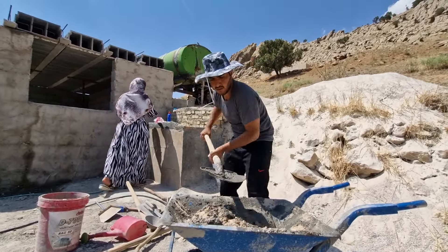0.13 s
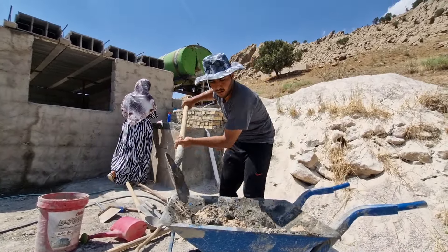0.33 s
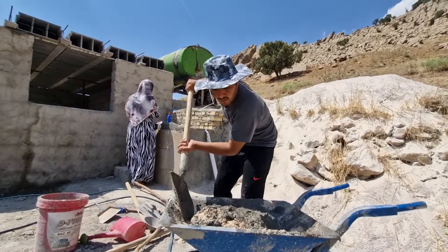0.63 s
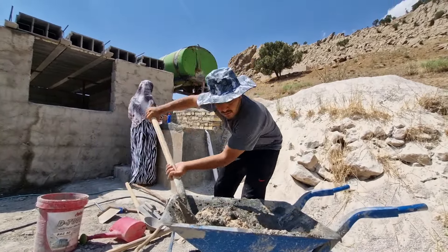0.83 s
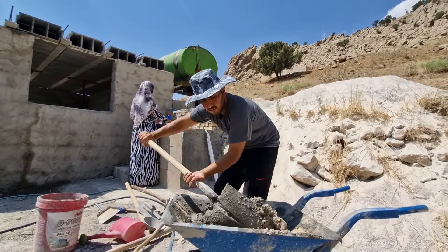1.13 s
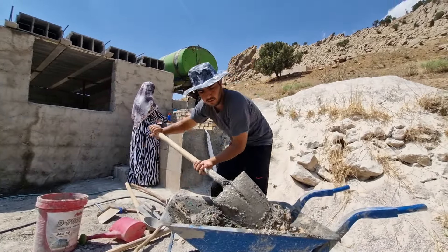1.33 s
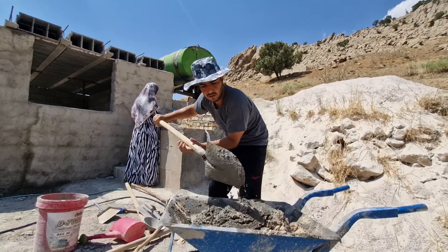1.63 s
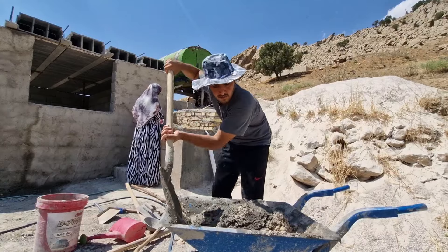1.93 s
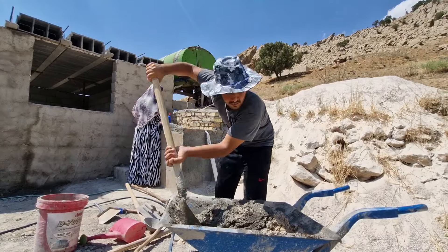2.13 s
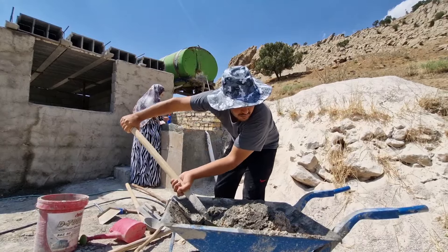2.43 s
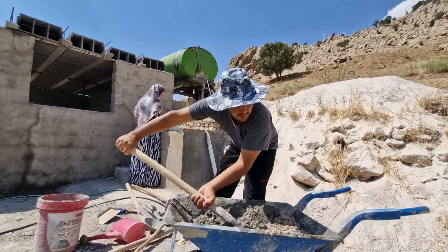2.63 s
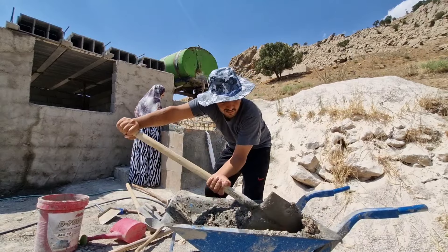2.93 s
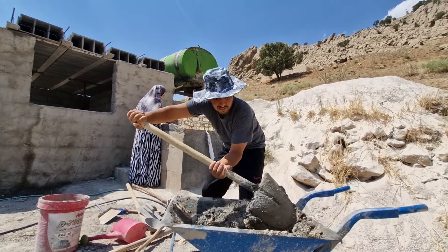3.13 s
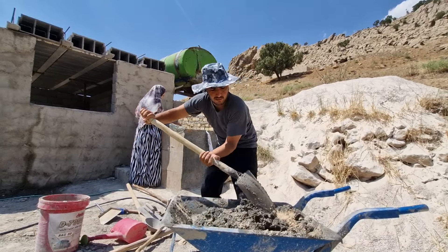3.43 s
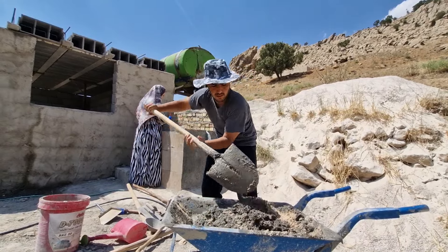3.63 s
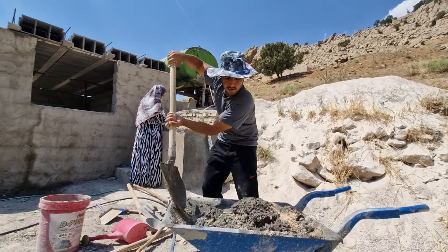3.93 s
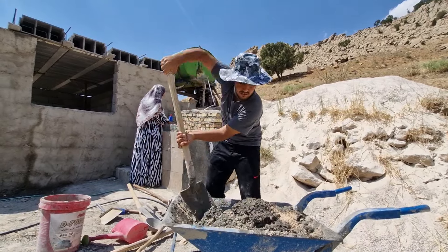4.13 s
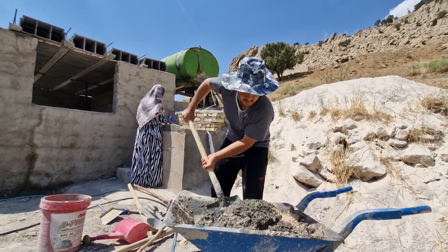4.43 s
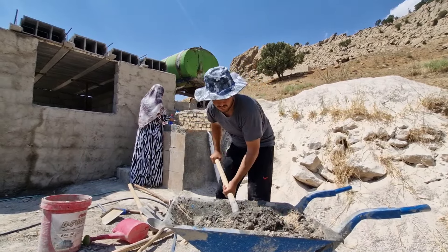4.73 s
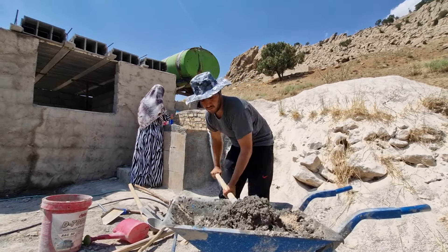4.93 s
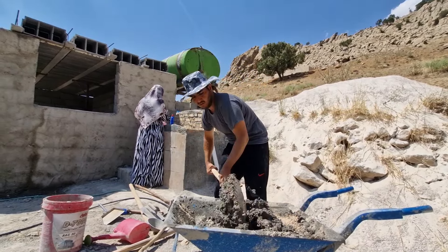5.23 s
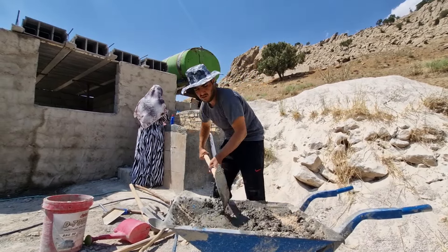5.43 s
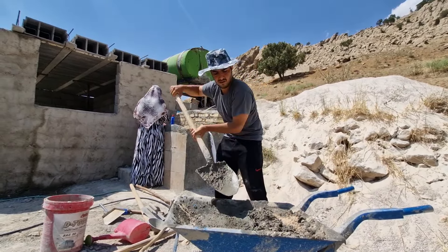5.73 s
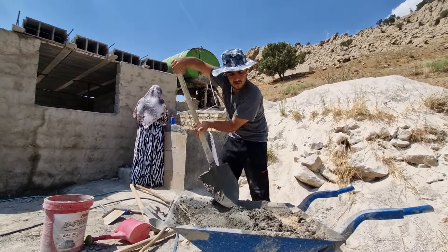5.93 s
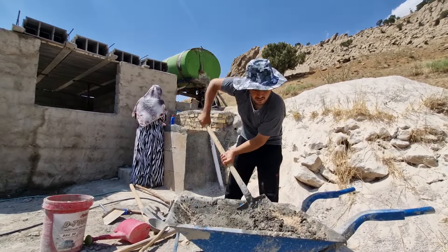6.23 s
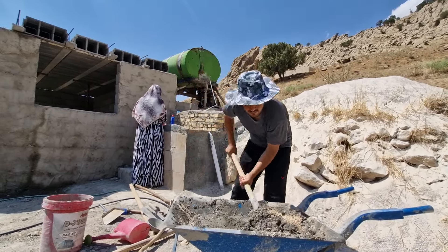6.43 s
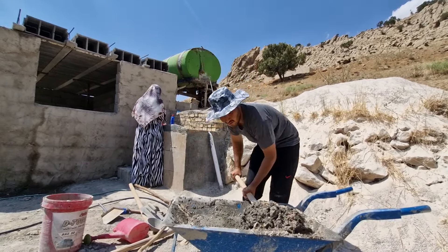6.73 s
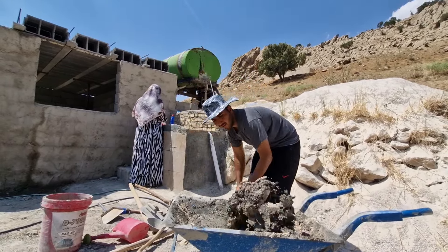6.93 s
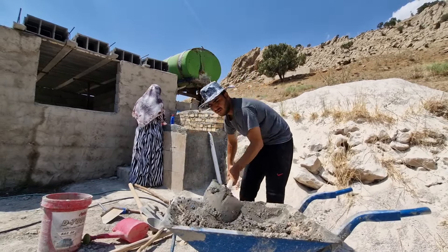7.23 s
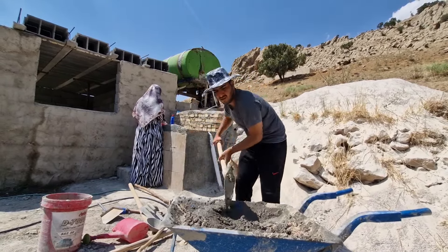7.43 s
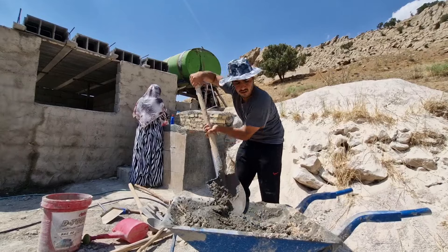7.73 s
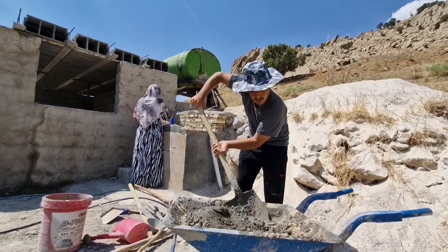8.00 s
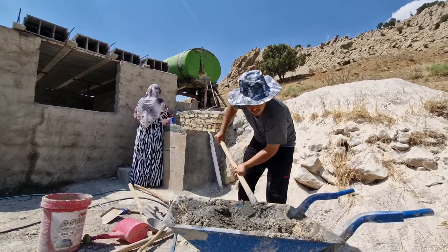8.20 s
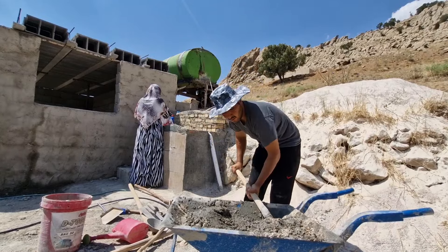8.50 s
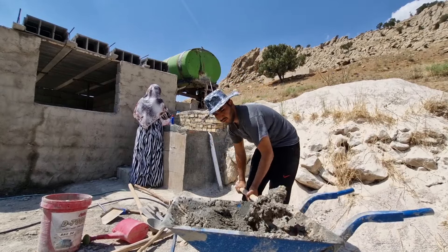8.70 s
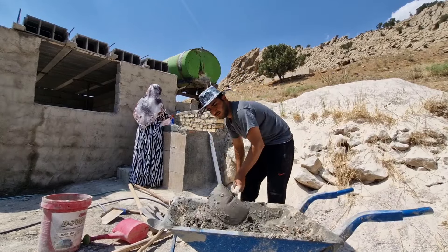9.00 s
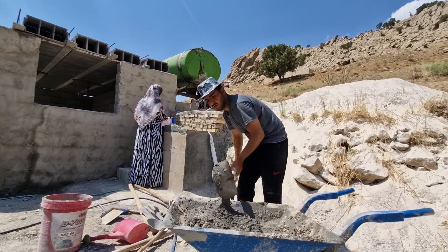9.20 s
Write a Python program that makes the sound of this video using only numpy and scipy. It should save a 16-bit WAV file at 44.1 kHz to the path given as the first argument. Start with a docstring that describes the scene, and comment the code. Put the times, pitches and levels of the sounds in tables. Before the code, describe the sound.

An open outdoor building site, dry and echo-free, heard close up in stereo. A faint distant rush and low wind buffeting run throughout, with soft puffs near 0.6, 2.7 to 3.7 and 5.2 s. Tiny thin rings open the scene. From 0.45 to 1 s a steel shovel crunches into wet, stony mortar in a metal wheelbarrow, with quick knocks. A lull of faint grainy rustle follows, then gritty scrapes, cracks and hollow tray knocks from 1.7 to 2.7 s. After a quiet gap with ticking crumbs, a sharp clank at 3.94 s starts scrapes and dull slaps until 4.7 s. Small knocks come around 5.1 and 5.4 s. Another clank at 5.87 s leads to heavy grinding and booming tray knocks until 6.5 s. A pause, a muted slap at 7.45 s, then the densest cluster of scrapes and blows from 7.7 to 8.4 s, fading to rustle and wind by 9.3 s.

```python
"""Outdoors by a two-port microphone: distant rush of the open site, low wind buffeting with puffs, faint rings,
a faint grainy rustle that drops out in places, crumbs ticking on steel.
From about 0.45 s a steel shovel works wet mortar in a sheet-metal wheelbarrow, in pushes and pauses.
The blade grinds sand and stones (noise in grains through its modes) over the tray, which hums at a pitch
set by the load of mortar; stones knock and lumps slap down (damped rings, noise bursts), densest near 8 s."""
import sys
import numpy as np
from scipy import signal
from scipy.fft import rfft, irfft, next_fast_len
from scipy.io import wavfile
from scipy.ndimage import uniform_filter1d, map_coordinates

SR = 44100
rng = np.random.default_rng(int(sys.argv[2]) if len(sys.argv) > 2 else 0)


def inscribe(sig):
    """Save sig as 16-bit PCM at rate SR to the path in sys.argv[1].

    A 1-D sig is mono; a 2-D sig holds one channel per row.
    Samples are clipped to [-1, 1] before scaling.
    """
    pcm = np.round(np.clip(np.atleast_2d(sig).T, -1, 1) * 32767)
    wavfile.write(sys.argv[1], SR, pcm.astype(np.int16))


N = 412776
TOP_HZ = 16150
# Table levels are relative: layer gains and the final balance follow.


def amp(db):
    """dB to amplitude factor."""
    return 10 ** (np.asarray(db) / 20)


def unit(x):
    """Scale to rms 1."""
    return x / np.sqrt(np.mean(np.abs(x) ** 2) + 1e-20)


def along(points, hz):
    """Interpolate (frequency [Hz], value) points on a log axis."""
    f, v = np.transpose(points)
    return np.interp(np.log(hz + 1), np.log(f + 1), v)


def curves(rows):
    """One value per sample for each column after the time."""
    s, *cols = np.transpose(rows)
    return [np.interp(np.arange(N) / SR, s, c) for c in cols]


def wobble(knots_hz):
    """Smooth random curve through random knots."""
    knots = rng.standard_normal(int(N * knots_hz / SR) + 4)
    return map_coordinates(knots, [np.arange(N) * knots_hz / SR])


def filtered(x, response):
    """Multiply the spectrum by a complex response of frequency."""
    m = next_fast_len(N + SR // 2)
    return irfft(rfft(x, m) * response(np.fft.rfftfreq(m, 1 / SR)), m)[..., :N]


def decaying(x, life_s):
    """One-pole exponential decay with time constant life_s."""
    return signal.lfilter([1], [1, -np.exp(-1 / (life_s * SR))], x)


def grains(rate_hz, spread_db, life_s):
    """Envelope of random contacts: sudden start, quick decay, a few much stronger than the rest."""
    strength = amp(spread_db * np.minimum(rng.exponential(size=N), 4))
    return decaying((rng.random(N) < rate_hz / SR) * strength, life_s)


def coloured(spectrum, envelope):
    """Two noises under one envelope, with the given spectrum, rms 1."""
    noise = envelope * rng.standard_normal((2, N))
    return unit(filtered(noise, lambda hz: amp(along(spectrum, hz))))


def ports(pair, alike, lags):
    """Left and right from a shared signal and a differing one, with a left-right lag for each stretch."""
    turn = lambda hz: np.arccos(np.clip(along(alike, hz), -1, 1)) / 2
    mid, side = filtered(pair, lambda hz: [np.cos(turn(hz)), np.sin(turn(hz))])
    both, out = np.array([mid + side, mid - side]), np.zeros((2, N))
    signs = np.array([[1], [-1]])  # each port takes half the lag
    for s, bass_s, treble_s in lags:
        lag_s = lambda hz: along([(1300, bass_s), (2200, treble_s)], hz)
        late = filtered(both, lambda hz: np.exp(-1j * np.pi * hz * lag_s(hz) * signs))
        start = round(s * SR)
        out[:, start:] = late[:, start:]
    return out


def patchy(x, depth_db):
    """Random gain patches, a few hundred Hz wide and some tens of ms long."""
    z = signal.stft(x, nperseg=256)[2]
    field = uniform_filter1d(rng.standard_normal(z.shape[1:]), size=3, axis=0)
    field = uniform_filter1d(field, size=10, axis=1)
    return signal.istft(z * amp(depth_db * unit(field)), nperseg=256)[1][:, :N]


# site spectrum: (frequency [Hz], level [dB])
SITE_SPECTRUM = [(71, -37), (120, -11), (167, -8.5), (302, -1.5), (897, -10.5), (1100, -6), (3340, -29.5),
                 (5240, -31.5), (8060, -39.5), (13200, -30.5), (16200, -34)]
# site level: (time [s], level [dB])
SITE_LEVEL = [(0, -52), (3, -54), (6, -47.5), (8.5, -53.5), (9.36, -54)]


def site():
    """Distant rush of the open site: coloured noise, gently unsteady."""
    rush = coloured(SITE_SPECTRUM, amp(1.75 * wobble(5.4) + 0.45 * wobble(0.68)))
    alike = [(200, 0.87), (1000, 0.96), (4000, 0.084)]
    return amp(curves(SITE_LEVEL)[0]) * ports(rush, alike, [(0.00069, -0.00035, -0.00035)])


# buffeting spectrum: (frequency [Hz], level [dB])
BUFFET_SPECTRUM = [(11, -37), (18, -27), (44, 3), (65, 2), (127, -8.5), (200, -18.5), (260, -41.5),
                   (440, -120)]
# buffeting level: (time [s], level [dB])
WIND_LEVEL = [(0.0, -53), (0.34, -63), (0.73, -53), (1.64, -59), (2.55, -50), (3.15, -47.5), (3.26, -52),
              (4.09, -47.5), (6.33, -53), (6.86, -60), (8.32, -53), (8.6, -49), (9.36, -61)]
# single puffs: (time [s], peak [dB], frequency [Hz])
PUFFS = [(0.136, -36, 76.4), (0.603, -24.5, 59.3), (2.685, -24.5, 56.93), (3.047, -23, 71),
         (3.255, -29, 60.5), (3.66, -24, 69.94), (4.627, -29, 54), (5.163, -24, 82), (5.24, -27, 60),
         (5.355, -26, 64)]


def wind():
    """Wind pressure on the microphone: low noise, partly different at each port, and puffs of about one swing."""
    (db,) = curves(WIND_LEVEL)
    lumps = amp(2.4 * wobble(17) + 5.3 * np.array([wobble(11), wobble(28)]))
    push, t = np.zeros(N + SR), np.arange(SR // 8) / SR
    for s, peak_db, hz in PUFFS:
        cycles = t * hz - 1.2
        puff = np.exp(-(cycles / 0.43) ** 2) * np.cos(2 * np.pi * cycles)
        push[round(s * SR):][:len(t)] += amp(peak_db) * puff
    buffet = amp(db + 6.5) * unit(lumps * coloured(BUFFET_SPECTRUM, 1))
    pair = buffet + push[:N] * [[1.2], [-.3]]
    return ports(pair, [(30, 0.088), (120, 0.078)], [(0.0056, 0.00054, 0)])


# faint short rings: (start [s], length [s], frequency [Hz], level [dB])
CHIRPS = [(0.01, 0.07, 2150, -51), (0.133, 0.016, 2130, -48)]


def chirps():
    """Faint thin tones, slightly wavering in level and pitch."""
    t, total = np.arange(N) / SR, np.zeros(N)
    for s, length_s, hz, db in CHIRPS:
        shape = np.sin(np.pi * np.clip((t - s) / length_s, 0, 1)) ** .5
        level = amp(db + 3.5 * wobble(52.3))
        turns = np.cumsum(hz * (1 + 0.004 * wobble(150))) / SR
        total += level * shape * np.sin(2 * np.pi * turns)
    return total * [[1.1], [.4]]


# grit, wet body and fine sand spectra, shared with scraping(): (frequency [Hz], level [dB])
GRIT_SPECTRUM = [(1060, -71), (1800, 8), (2020, 2), (2310, 8), (2500, 2.5), (3750, 5), (6400, 1),
                 (7600, -21), (9750, -30.5), (16500, -120)]
BODY_SPECTRUM = [(320, -7.5), (550, -3.5), (642, -3.5), (952, -1), (1150, -13.5), (1450, -7.5),
                 (2400, -17.5), (3120, -53), (5280, -120)]
SAND_SPECTRUM = [(4120, -1.5), (7000, 1.5), (8200, -2.5), (12700, 2), (15500, -4), (16200, -28)]
# rustle level: (time [s], level [dB])
RUSTLE_LEVEL = [(0, -58.5), (.17, -59), (.24, -68), (.43, -68), (.7, -51), (1.2, -58.5), (1.74, -56.5),
                (1.8, -67.5), (1.87, -63), (2.5, -43), (2.9, -56.5), (3.9, -61), (4.3, -58), (5.55, -57),
                (5.63, -71), (5.85, -95.5), (6.1, -49), (6.7, -60), (7.2, -56.5), (7.54, -64),
                (7.58, -68.5), (7.69, -57.5), (8.2, -49), (8.5, -63.5), (9, -58.5), (9.36, -69)]


def rustle():
    """Faint grainy rustle between and under the pushes, dropping out in places: noise in random grains."""
    (db,) = curves(RUSTLE_LEVEL)
    grain = unit(grains(300, 0.4, 0.0068)) + 0.93
    coarse = coloured(GRIT_SPECTRUM, grain) + coloured(BODY_SPECTRUM, grain)
    return amp(db) * (coarse + amp(-0.5) * coloured(SAND_SPECTRUM, grain + 1.3))


# single crumbs of mortar ticking on the steel: (time [s], level [dB], frequency [Hz])
CRUMBS = [(0.085, -43, 2300), (1.3962, -42, 2548), (1.6126, -45, 2450), (1.92, -30.5, 4370),
          (2.556, -30, 5000), (2.8341, -41, 2230), (3.102, -47, 12900), (4.522, -34.5, 4330),
          (5.0485, -42, 3240), (5.5084, -41, 7540), (6.917, -44, 1000), (7.043, -46, 6000),
          (8.7946, -45, 1880), (8.9871, -46, 4210)]
CRUMB_T60_S, CRUMB_SKIP_S = 0.014, 0.01
CRUMB_SPREAD = 0.4  # largest log offset of a partial


def crumbs():
    """Each crumb skips briefly: a handful of short rings around its pitch."""
    total, t = np.zeros(N + SR), np.arange(SR // 20) / SR
    for (s, db, hz), chance in zip(CRUMBS, rng.random((len(CRUMBS), 2, 14))):
        for late, tune in chance.T:
            part_hz = min(hz * np.exp(CRUMB_SPREAD * 2 * (tune - .5)), TOP_HZ)
            start = round((s + CRUMB_SKIP_S * late ** 2) * SR)
            total[start:][:len(t)] += amp(db - 60 * t / CRUMB_T60_S) * np.sin(2 * np.pi * part_hz * t)
    return total[:N] * [[1], [.3]]


# blade pushes: (start [s], length [s], grit [dB], level change over the push [dB], wet body over grit [dB],
#   fine sand over grit [dB], tray hum [dB])
PUSHES = [(0.445, 0.012, -27, -0.5, -13.5, -6, -41), (0.5, 0.13, -34.5, -13.5, -2, -6.5, -45),
          (0.602, 0.143, -43, 13.5, 0.5, -6.5, -68), (0.834, 0.18, -34.5, -11.5, 1.5, -6, -32.5),
          (1.325, 0.13, -52.5, -3, 0, -3, -72), (1.671, 0.071, -33, -19.5, 2, -6.5, -57),
          (1.866, 0.079, -32.5, -17, 0.5, -8, -19.5), (1.947, 0.11, -38.5, 0.5, 0, -10.5, -42),
          (2.089, 0.14, -30.5, -15, 0.5, -5, -28), (2.243, .11, -56, 10, 7, -1, -45.5),
          (2.373, 0.21, -34.5, -1, -2.5, -8, -36.5), (2.587, 0.1, -38, 0.5, 0.5, -8.5, -33),
          (2.805, 0.041, -47.5, 2, -3, -11, -48), (3.407, 0.18, -56.5, 3, 8, -2.5, -71),
          (3.94, 0.019, -13, -21, -28, 1.5, -8), (4.103, 0.12, -35.5, 0.5, 2, -8.5, -36.5),
          (4.247, 0.032, -38, -6.5, 0, 0.5, -23), (4.309, 0.1, -38, -0.5, 5, -13.5, -24),
          (4.431, 0.15, -44.5, -2.5, 5.5, -13, -28.5), (4.589, 0.14, -48, 3, 1.5, -8, -35),
          (5.32, 0.11, -47.5, -7.5, 0.5, -5, -48), (5.86, 0.025, -15.5, -24, 0.5, -18, -28),
          (5.923, 0.2, -43, 17.5, -2.5, -11, -62.5), (6.136, 0.11, -36.5, -9, 5.5, -13.5, -22),
          (6.246, 0.084, -38.5, -7, 6.5, -7, -30.5), (6.34, 0.12, -37.5, -11, 3.5, -7, -31.5),
          (6.438, 0.11, -40, -2.5, 4.5, -5, -29.5), (7.441, 0.082, -46, -3.5, 6.5, -33, -32),
          (7.701, 0.018, -26, -8, -1, -10, -21), (7.827, 0.15, -39.5, 6.5, -3, -9, -44),
          (8.011, 0.1, -35.5, -6, 8, -30, -29), (8.123, 0.034, -31.5, -8.5, -29, 14, -17),
          (8.173, 0.21, -40.5, 6.5, 1.5, -7, -34.5)]
BITE_S, LIFT_T60_S = 0.0074, 0.099


def pushes(column_db):
    """Sum of push envelopes: quick bite, steady rise or fall, fade as the blade lifts; column_db picks the level."""
    t, total = np.arange(N) / SR, np.zeros(N)
    for row in PUSHES:
        s, length_s, change_db = row[0], row[1], row[3]
        at = slice(round(s * SR), round((s + length_s) * SR) + SR // 4)
        u = np.maximum(t[at] - s, 0)
        fade_db = -60 * np.maximum(u - length_s, 0) / LIFT_T60_S
        level_db = column_db(row) + change_db * np.minimum(u / length_s, 1) + fade_db
        total[at] += amp(level_db) * (1 - np.exp(-u / BITE_S))
    return total


# tray main mode under the load: (time [s], frequency [Hz])
TRAY_PITCH = [(0.45, 400), (0.85, 457.6), (1.0, 458), (1.87, 327), (2.0, 361), (2.116, 298.4), (2.2, 390.4),
              (2.45, 418), (2.68, 368.5), (3.94, 324.6), (4.12, 335.6), (4.16, 429.7), (4.255, 510.3),
              (4.33, 445), (4.64, 384.3), (6.11, 360), (6.15, 455), (6.2, 429), (6.266, 323.2),
              (6.42, 321.6), (6.49, 411), (7.44, 351), (7.7, 396.5), (7.96, 379.2), (8.01, 521.3),
              (8.085, 491), (8.13, 402), (8.15, 461.6), (8.35, 433)]


def tray_pitch():
    """The shifting load of mortar glides the tray's pitch [Hz]."""
    return curves(TRAY_PITCH)[0]


# tray modes, shared with hits(): (pitch ratio [-], level [dB], decay time constant at a blow [s])
TRAY_MODES = [(1, 4, 0.0066), (.76, -6, 0.0077), (1.25, -7.5, 0.006), (1.1, -22, 0.0082)]
DRAG_RING, DRAG_SIDE_DB = 1.8, -7  # under drag: longer decay (ratio), weaker side modes


def tray():
    """Jolts of the sliding blade ring the tray's lowest modes; the mortar's weight shifts their pitch."""
    hum, turns = np.zeros((2, N)), np.cumsum(tray_pitch()) / SR
    for ratio, mode_db, life_s in TRAY_MODES:
        noise = rng.standard_normal((2, N)) + 1j * rng.standard_normal((2, N))
        jolts = (grains(120, 2.7, 0.0015) + 0.4) * noise
        swing = unit(decaying(jolts, DRAG_RING * life_s))
        level_db = mode_db + DRAG_SIDE_DB * (ratio != 1)
        hum += amp(level_db) * (swing * np.exp(2j * np.pi * ratio * turns)).real
    return pushes(lambda p: p[6]) * hum


# stone hits and slaps: (time [s], crack peak [dB], knock [dB], knock frequency [Hz], tray [dB], thud [dB])
HITS = [(0.448, -27, -29, 710, -39, -67), (0.6331, -25, -21.5, 760, -44, -50),
        (0.6745, -17, -22.5, 780, -45, -58), (0.7085, -17, -13, 900, -29, -62),
        (0.7337, -28, -18, 880, -32, -50), (0.855, -24, -33, 720, -20, -29),
        (0.9414, -40, -29, 940, -24, -52), (0.9976, -26.5, -22, 556, -25, -60),
        (1.6742, -30, -37.5, 630, -55, -55), (1.8699, -14, -21.5, 960, -16, -29),
        (1.888, -19, -31, 2400, -38, -39), (1.9048, -24, -25.5, 730, -30, -31),
        (1.9847, -23, -27, 693, -26, -55), (2.075, -18, -32, 810, -38, -49),
        (2.1005, -7.5, -39, 950, -23.5, -34), (2.12, -28, -23, 820, -45, -39),
        (2.143, -11, -28, 1190, -46, -50), (2.1925, -10.5, -24.5, 720, -20, -47),
        (2.3982, -18.5, -37, 700, -21, -42), (2.4491, -9, -20, 646, -19, -42),
        (2.4733, -38, -25, 750, -23, -27), (2.6117, -15, -20, 910, -40, -57),
        (2.6684, -26, -25, 575, -16, -27), (3.943, -7, -20, 2170, -19, -24),
        (3.9579, -9.5, -13.5, 2120, -27, -16), (4.111, -9.5, -10, 706, -15, -42),
        (4.157, -13.5, -23, 603, -22, -29), (4.1908, -17, -22, 610, -18, -15),
        (4.199, -7.5, -17, 1462, -18, -29), (4.3308, -20, -33, 604, -12.5, -40),
        (4.564, -24, -25, 836, -18.5, -43), (4.705, -19, -29, 679, -25, -32),
        (5.103, -29, -44, 670, -34, -36.5), (5.3595, -33, -34, 680, -35.5, -29),
        (5.865, -21, -11.5, 2200, -32.5, -24), (5.879, -24, -32, 2000, -44, -20),
        (6.059, -12.5, -35, 2107, -48, -46), (6.094, -19, -18, 950, -41, -37),
        (6.106, -16, -10.5, 1920, -14.5, -23), (6.1527, -18, -43, 603, -7, -27),
        (6.3543, -13.5, -20, 1060, -29, -35), (6.3992, -40, -44, 1320, -23, -54),
        (6.4442, -14, -24.5, 898.5, -30, -53), (6.5141, -12.5, -8.5, 735.5, -11, -49),
        (6.5295, -17, -19.5, 746, -22, -27.5), (7.4459, -35, -19, 2520, -17, -27),
        (7.4788, -52, -28, 726, -21, -25), (7.4886, -48, -40, 788, -23, -30),
        (7.509, -32, -34, 710.8, -29, -32), (7.706, -15, -19, 1121, -17, -22),
        (7.9369, -12, -21.5, 783.4, -53, -48), (7.9525, -6, -21, 971.5, -41, -45),
        (8.0137, -23, -27, 710, -30, -54), (8.0347, -33, -18.5, 600, -15, -57),
        (8.0572, -19, -24, 614, -17.5, -54), (8.074, -27, -25, 577.5, -12, -48),
        (8.1045, -42, -26, 1046, -29.5, -37), (8.1347, -3, -44, 594, -12, -35),
        (8.1495, -5, -46, 720, -9, -33), (8.1933, -13, -21, 586, -13, -52),
        (8.255, -24, -20.5, 1460, -40, -60), (8.276, -16.5, -20, 1415, -26, -59),
        (8.301, -15, -27, 1009, -24, -55), (8.343, -11.5, -16.5, 633, -9.5, -48),
        (8.3528, -30, -33, 880, -8.5, -40), (8.366, -30, -30, 906, -15.5, -47)]
# blade modes, shared with scraping(): (frequency [Hz], width [Hz], level [dB])
BLADE_MODES = [(1375, 138, -4.5), (1988, 124, -5), (2524, 78, -6.5), (2757, 200, -7.5), (3060, 44, -12),
               (4160, 160, -7.5), (4520, 36, -10.5), (5170, 55, -4), (5560, 53, -5.5), (6360, 53, -10.5)]
# crack spectrum: (frequency [Hz], level [dB])
CRACK_SPECTRUM = [(410, -27), (700, -3.5), (1620, -7.5), (5090, -8.5), (7970, -18), (9580, -18),
                  (14000, -14), (16200, -45)]
CRACK_T60_S, KNOCK_T60_S, THUD_T60_S, THUD_HZ, TRAY_RISE_S = 0.033, 0.037, 0.048, 161.5, 0.0037
CREST_DB = 5.5  # crack peak over its mean level
CLANG_DB, CLANG_SCATTER_DB = -15.5, 5  # blade modes over the crack; scatter per blow
KNOCK_SPREAD = 0.18  # log spread of a knock's partials


def hits():
    """Each blow: crackling noise burst, short knock and clang of the blade, damped tray swing, low thud."""
    crack, ring = np.zeros(N + SR), np.zeros(N + SR)
    t, pitch_hz = np.arange(SR // 4) / SR, tray_pitch()

    def swing(db, hz, t60_s, rise_s, turn):
        """Damped sine with a soft start."""
        return amp(db - 60 * t / t60_s) * (1 - np.exp(-t / rise_s)) * np.sin(2 * np.pi * (hz * t + turn))

    chances = rng.random((len(HITS), 3 + len(BLADE_MODES)))
    for (s, db, knock_db, knock_hz, tray_db, thud_db), chance in zip(HITS, chances):
        at = slice(round(s * SR), round(s * SR) + len(t))
        crack[at] += amp(db - CREST_DB - 60 * t / CRACK_T60_S) * (1 - np.exp(-t / 0.0025))
        for tune, part_db in zip((0, -.5 - chance[0], .5 + chance[1]), (-1, -6, -7)):
            part_hz = knock_hz * np.exp(KNOCK_SPREAD * tune)
            ring[at] += swing(knock_db + part_db, part_hz, KNOCK_T60_S, 0.00082, 0)
        ring[at] += swing(thud_db, THUD_HZ, THUD_T60_S, 0.006, chance[2])
        for ratio, mode_db, life_s in TRAY_MODES:
            mode_hz = ratio * pitch_hz[at.start]
            ring[at] += swing(tray_db + mode_db, mode_hz, np.log(1000) * life_s, TRAY_RISE_S, 0)
        for (hz, width_hz, mode_db), luck in zip(BLADE_MODES, chance[3:]):
            level_db = db + CLANG_DB + mode_db + CLANG_SCATTER_DB * 2.6 * (luck - .5)
            ring[at] += swing(level_db, hz, np.log(1000) / (np.pi * width_hz), 0.00018, 7 * luck)
    splinters = unit(grains(550, 2.4, 0.0053) + 0.82)
    return crack[:N] * coloured(CRACK_SPECTRUM, splinters) + ring[:N] * [[1.9], [.15]]


STONE_SPREAD = 0.451  # scales the log spread of pitch


def stones(mid_hz, decay_cycles, count, size):
    """Stones under the blade: short damped rings, each of its own pitch and strength."""
    chance, t = rng.random((count, 4)), np.arange(size) / SR
    hz = np.clip(mid_hz * np.exp(STONE_SPREAD * 3.38 * (chance[:, 1:2] - .5)), 200, 12000)
    strength = amp(-4 * np.log(chance[:, 2:3] + 0.092))
    rings = strength * np.exp(-t * hz / decay_cycles) * np.sin(2 * np.pi * hz * t)
    at = (chance[:, :1] * N).astype(int) + np.arange(size)
    sides = (1, 2 * chance[:, 3:] - 1)
    return unit(np.array([np.bincount(at.ravel(), (rings * side).ravel(), N + size)[:N] for side in sides]))


STONES_DB, STONE_HZ, STONE_CYCLES = -5.5, 3200, 13  # pebbles, over grit
LUMPS_DB, LUMP_HZ, LUMP_CYCLES = -3.5, 616, 4.6  # larger dull stones, over the wet body


def blade_response(f):
    """Direct path plus the blade's resonances."""
    return 1 + 3 * sum(amp(db) * 1j * f * w / (c * c - f * f + 1j * f * w) for c, w, db in BLADE_MODES)


def scraping():
    """Sand and stones grind under the blade: noise crushed into grains, partly through the blade's modes."""
    crunch = unit(grains(90, 0.68, 0.0044)) + 1.26 * unit(grains(1600, 3.7, 0.0056)) + 0.5
    grit = unit(filtered(coloured(GRIT_SPECTRUM, crunch), blade_response))
    grit += amp(STONES_DB) * stones(STONE_HZ, STONE_CYCLES, count=6000, size=256)
    body = unit(filtered(coloured(BODY_SPECTRUM, crunch), blade_response))
    body += amp(LUMPS_DB) * stones(LUMP_HZ, LUMP_CYCLES, count=900, size=1024)
    sand = coloured(SAND_SPECTRUM, crunch + 0.24)
    coarse = pushes(lambda p: p[2]) * grit + pushes(lambda p: p[2] + p[4]) * body
    return coarse + pushes(lambda p: p[2] + p[5]) * sand


# shovel at the two ports: (frequency [Hz], likeness [-])
SHOVEL_ALIKE = [(100, 0.77), (500, 1), (1000, 0.67), (2500, 0.18), (8000, 0.18)]
# blade moves along the barrow, nearer the left port: (start [s], bass left-right lag [s], treble lag [s])
SHOVEL_LAGS = [(0, -0.00018, -0.00031), (4.29, -0.00018, -0.00021), (5.5, -0.00015, -0.0002),
               (7.2, -0.00013, -0.00014)]
SHIFT_DB = 3.5  # depth of random shifts in colour of the scraping


def scene():
    """Shovel at the two ports, slightly left, over wind and site."""
    work = patchy(scraping(), SHIFT_DB) + patchy(rustle(), depth_db=2.0)
    work = work + tray() + hits() + chirps() + crumbs()
    shovel = ports(work, SHOVEL_ALIKE, SHOVEL_LAGS)
    return shovel * amp([[.35], [-.35]]) + wind() + site()


def record(dry):
    """Band limit: only frequencies below TOP_HZ pass."""
    return filtered(dry, lambda hz: hz < TOP_HZ)


dry = scene()
out = record(dry)
inscribe(out)
```